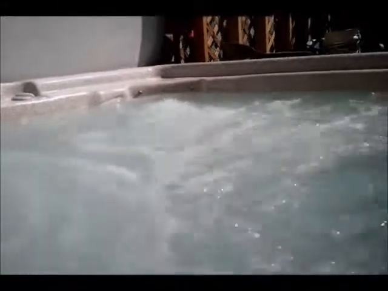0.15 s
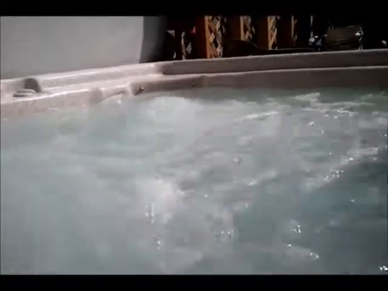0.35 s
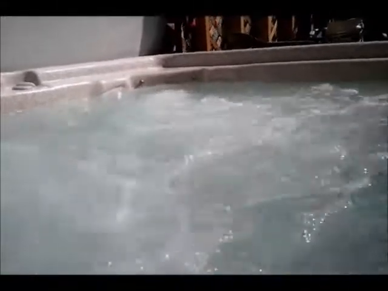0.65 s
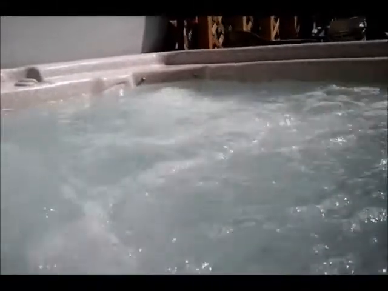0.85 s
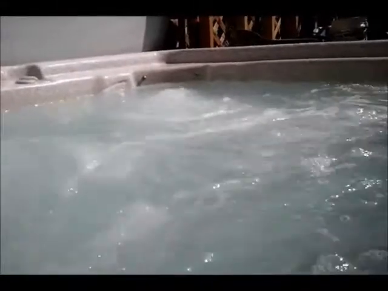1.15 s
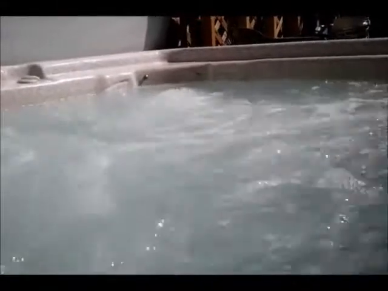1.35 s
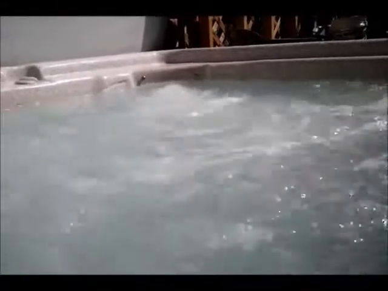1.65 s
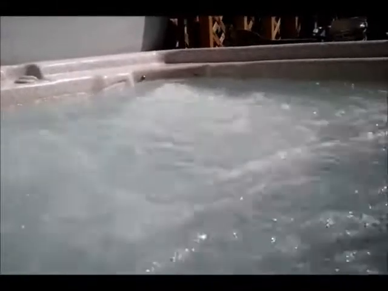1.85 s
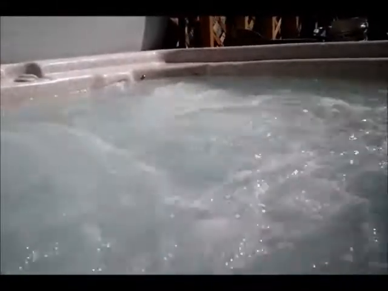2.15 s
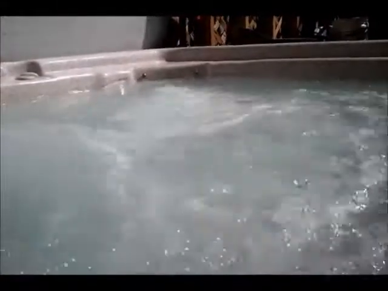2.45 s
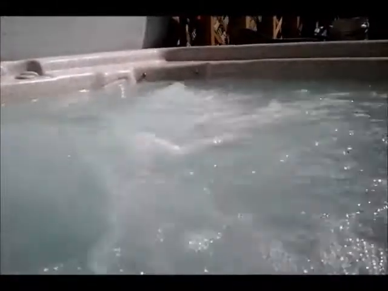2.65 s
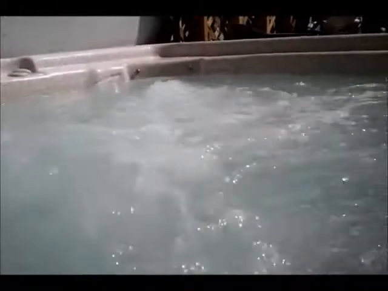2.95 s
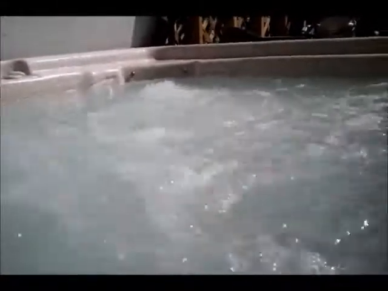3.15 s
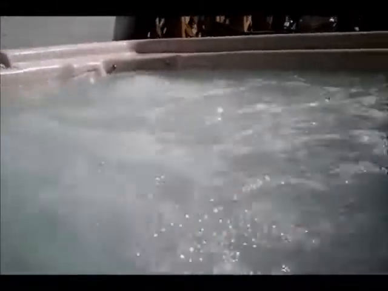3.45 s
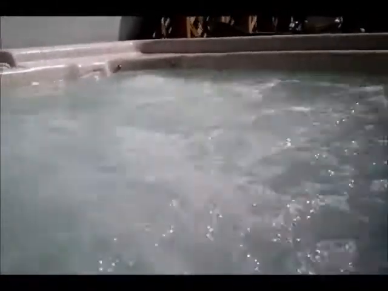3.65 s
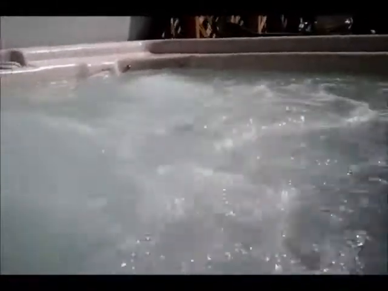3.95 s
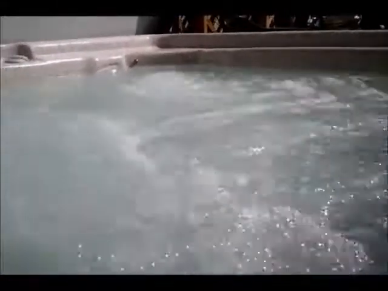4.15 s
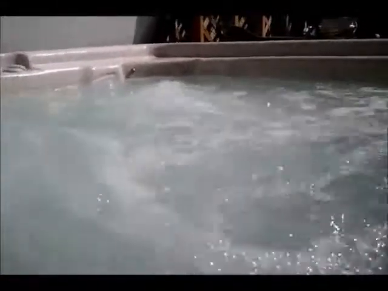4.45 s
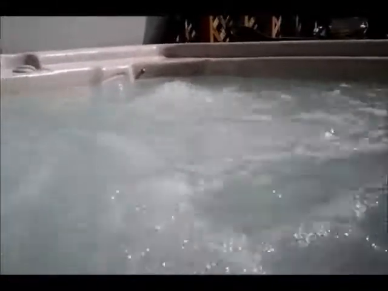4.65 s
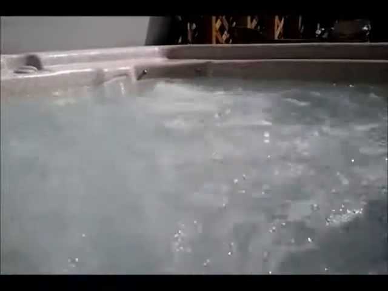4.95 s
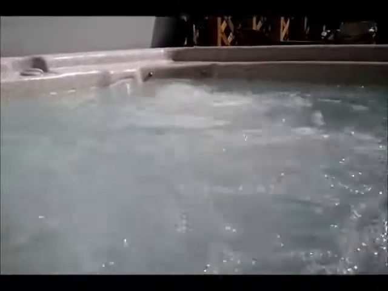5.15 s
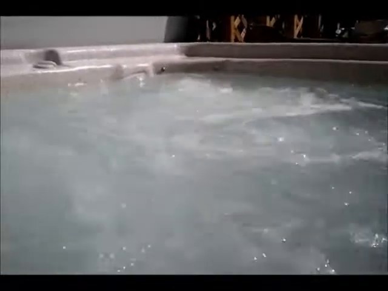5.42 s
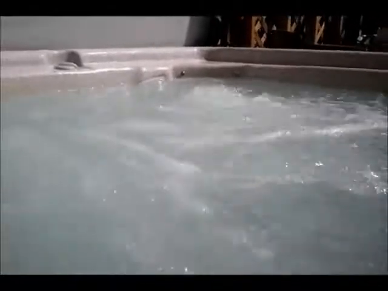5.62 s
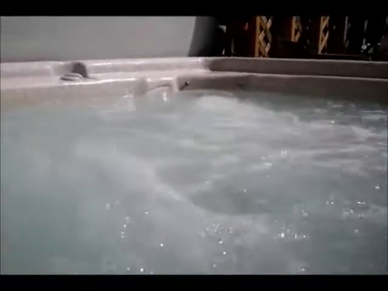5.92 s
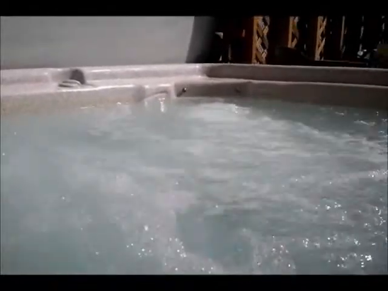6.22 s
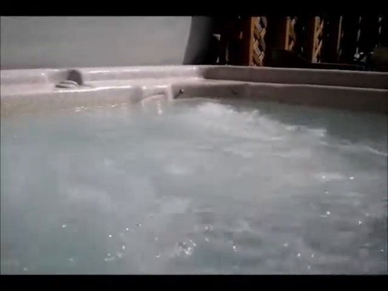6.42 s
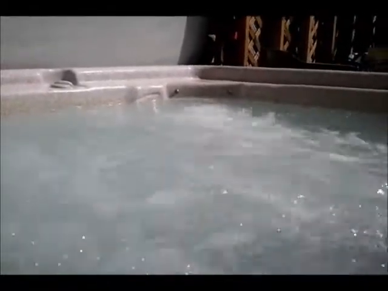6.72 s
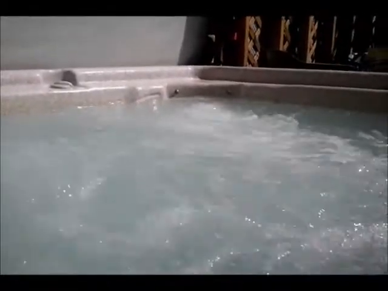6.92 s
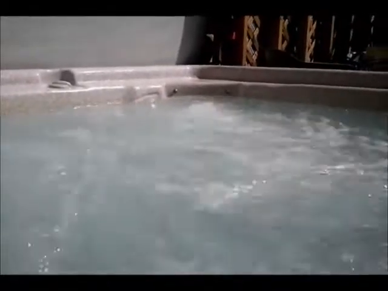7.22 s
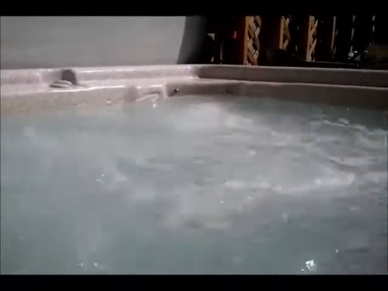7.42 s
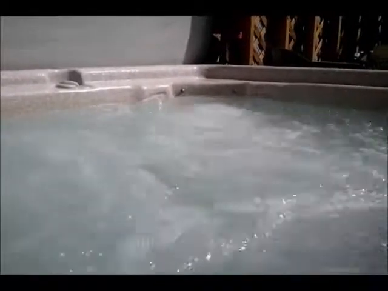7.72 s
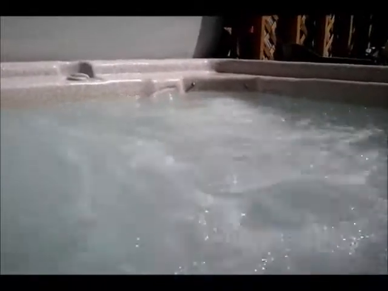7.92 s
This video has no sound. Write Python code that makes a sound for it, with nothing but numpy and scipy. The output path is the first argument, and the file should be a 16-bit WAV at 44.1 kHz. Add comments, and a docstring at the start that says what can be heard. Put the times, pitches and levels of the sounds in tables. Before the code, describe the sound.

A deep constant pump hum under bubbling, rumbling tub water, soft froth hissing on top, with sharp nearby drips and one hard splash.

```python
"""At the rim of an outdoor hot tub, the pump hums, jets churn up clouds of bubbles and foam fizzes.
Sines make the pump; damped, rising sines over coloured noise make the bubbles; narrow noise simmers.
Close by, crests splash as bursts of noise and drops plop as ringing bubbles; the tub's shell answers.
A small camera ducks its gain on the loudest splashes and clips their peaks."""
import sys
import numpy as np
from scipy import signal
from scipy.fft import rfft, irfft, next_fast_len
from scipy.io import wavfile
from scipy.ndimage import uniform_filter1d, map_coordinates

SR = 44100
rng = np.random.default_rng(int(sys.argv[2]) if len(sys.argv) > 2 else 0)


def generate_wav(sig):
    """Save sig (samples, or channels by samples) to the path in sys.argv[1] as 16-bit PCM at SR."""
    pcm = np.round(np.clip(np.atleast_2d(sig).T, -1, 1) * 32767).astype(np.int16)
    wavfile.write(sys.argv[1], SR, pcm)


N = 356311
T = np.arange(N) / SR  # time in seconds


def amp(db):
    """Logarithmic level: decibels become an amplitude gain."""
    return 10 ** (np.asarray(db) / 20)


def unit(x):
    """Normalisation: x is scaled to rms 1."""
    return x / np.sqrt(np.mean(x ** 2) + 1e-20)


def noise(length=N):
    """White noise: independent normal samples hold equal mean power at every frequency."""
    return rng.standard_normal(length)


def wobble(rate):
    """Slow random modulation: a smooth curve through random knots, rate of them a second."""
    return map_coordinates(noise(400), [T * rate + 2], mode="mirror")


def filtered(x, gain):
    """Linear filtering: the spectrum of x is multiplied by a gain that depends on frequency."""
    m = next_fast_len(len(x) + 8192)
    hz = np.fft.rfftfreq(m, 1 / SR) + 0.0012  # just above zero, so that its logarithm exists
    return irfft(rfft(x, m) * gain(hz), m)[:len(x)]


def coloured(x, spectrum):
    """Spectral shaping: x takes on a curve of (Hz, relative dB) points, at rms 1."""
    point_hz, point_db = np.transpose(spectrum)

    def gain(hz):
        return amp(np.interp(np.log(hz), np.log(point_hz), point_db, left=-120, right=-120))

    return unit(filtered(x, gain))


def add(track, s, sound):
    """Superposition: a sound is summed into the track from time s."""
    part = track[round(s * SR):][:len(sound)]
    part += sound[:len(part)]


# Steady tones of the pump's turning parts. Each row: frequency in Hz, level in dB rms.
SHAFT_TONES = [(48.7, -33), (57.6, -30.5)]


def pump():
    """Magnetic hum: the motor sounds at twice the mains rate; its turning parts add faint low tones."""
    mains_hz, hum_db, waver_db = 60.003, -13.5, 0.74
    hum = amp(hum_db + waver_db * wobble(6.5)) * np.sin(2 * np.pi * 2 * mains_hz * T)
    shafts = sum(amp(db) * np.sin(2 * np.pi * hz * T + 0.22 * wobble(1.4)) for hz, db in SHAFT_TONES)
    return np.sqrt(2) * (hum + shafts)  # a sine of rms 1 peaks at the root of 2


def bubbles(count, lo_hz, hi_hz, cycles, spread_db, rise):
    """Bubble resonance: a cloud of damped, rising sines of random size, even in power per Hz, at rms 1."""
    when, size, strength = rng.random((count, 3)).T[:, :, None]
    hz = lo_hz * (hi_hz / lo_hz) ** size
    k = np.arange(min(int(cycles * SR / lo_hz), 5000000 // count))  # capped to save memory
    age = k / SR * hz / cycles  # 1 after the given number of cycles at the starting pitch
    gain = hz * amp(-spread_db * np.log(1 - .99 * strength))
    phase = 2 * np.pi * cycles * age * (1 + rise * age / 2)
    ring = gain * np.exp(-4 * age) * np.sin(phase)
    sample = (when * N).astype(int) + k
    return unit(np.bincount(sample.ravel(), ring.ravel(), N)[:N])


def wash(grains, spectrum, near_db):
    """Statistical blur: near bubbles stand in the noise of countless faint ones, at rms 1."""
    blur = coloured(noise(), spectrum)
    return unit(blur + amp(near_db) * coloured(grains, spectrum))


# Strength of the flow at the surface, interpolated in time.
# Each row: time in seconds, burble level in dB before trim, foam level in dB before trim.
SURFACE_FLOW = [(0.0, -22, -23), (0.43, -24.5, -23), (0.83, -21, -22), (1.26, -22.5, -22.5),
                (4.19, -25, -24), (5.31, -23.5, -23), (5.71, -25, -23), (7.63, -24.5, -24),
                (8.08, -23, -21.5)]
# Colours of big air pockets, their gurgle, small surface bubbles and the finest froth.
# Each row of the four: frequency in Hz, relative level in dB per Hz.
RUMBLE_COLOUR = [(12, -11), (25, -6.5), (45, -8.5), (60, -7.5), (75, 1), (97, 2), (140, 2), (175, -5.5),
                 (260, -22.5), (600, -56)]
CHURN_COLOUR = [(100, -24), (175, -5), (220, 1.5), (290, -1.5), (380, -5), (450, -3), (620, -6.5),
                (780, -11), (1100, -14.5), (1600, -36), (3500, -39)]
BURBLE_COLOUR = [(600, -14), (1200, -7), (1550, -4), (1950, -4.5), (2300, -8), (2800, -13), (3600, -17),
                 (6000, -30.5)]
FOAM_COLOUR = [(1500, -8.5), (2700, -10), (3400, -12.5), (4200, -5.5), (5200, -2.5), (6300, -3.5),
               (7000, -9), (7600, -16)]


def jets():
    """Size sets pitch: big air pockets rumble and gurgle; small bubbles burble and fizz at the surface."""
    rumble_db, churn_db = -20.0, -18.0
    burble_trim_db, foam_trim_db = -0.36, 0.74
    s, burble_flow_db, foam_flow_db = np.transpose(SURFACE_FLOW)
    burble_db = np.interp(T, s, burble_flow_db) + burble_trim_db
    foam_db = np.interp(T, s, foam_flow_db) + foam_trim_db
    surge = wobble(9)  # crests stir the surface and the foam together

    rumble = coloured(noise(), RUMBLE_COLOUR)
    gurgles = bubbles(count=3000, lo_hz=161.7, hi_hz=1448, cycles=16.7, spread_db=2.5, rise=0.14)
    churn = wash(gurgles, CHURN_COLOUR, near_db=-6)
    small = bubbles(count=6000, lo_hz=885, hi_hz=3656, cycles=18, spread_db=3.3, rise=0.15)
    burble = wash(small, BURBLE_COLOUR, near_db=-1.5)
    fizz = bubbles(count=24000, lo_hz=2520, hi_hz=7950, cycles=7.5, spread_db=3, rise=0.22)
    foam = wash(fizz, FOAM_COLOUR, near_db=-5)

    deep = rumble * amp(rumble_db + 1.0 * wobble(4.6)) + churn * amp(churn_db + .2 * wobble(12))
    surface = burble * amp(burble_db + 0.61 * surge + 1.0 * wobble(25))
    froth = foam * amp(foam_db + 0.21 * surge + .6 * wobble(30))
    return deep + surface + froth


# Narrow band of like-sized bubbles. Each row: frequency in Hz, relative level in dB per Hz.
SIMMER_COLOUR = [(1700, -25.5), (1950, -3), (2050, 2), (2150, -4.5), (2400, -29)]
# Patches that swell and fade.
# Each row: time of the peak in seconds, level in dB, time constant of swell and fade in seconds.
SIMMER_PATCHES = [(4.399, -30.5, .13), (5.167, -26, 0.16), (6.72, -27, .05)]


def simmer():
    """Shared resonance: bubbles of one size sing in a narrow band; patches swell and fade evenly."""
    swell = amp(-36.5)  # the faint rest between patches
    for s, db, fade_s in SIMMER_PATCHES:
        swell = swell + amp(db) * np.exp(-np.abs(T - s) / fade_s)
    return swell * coloured(noise(), SIMMER_COLOUR)


def shell(x, wet_db, t60):
    """Reverberation: the tub's walls and the water surface throw back a short flurry of echoes."""
    t = np.arange(SR // 4) / SR
    echoes = noise(len(t)) * amp(-60 * t / t60) * (t > .003)  # the first arrive after 3 ms
    tail = unit(echoes) / np.sqrt(len(t))  # unit energy
    return np.pad(x, (0, len(t) - 1)) + amp(wet_db) * signal.fftconvolve(x, tail)


def spray(t, centre_hz, octaves):
    """Band-limited noise: fine droplets hiss in a bell-shaped band around one pitch, at rms 1."""
    return unit(filtered(noise(len(t)), lambda hz: np.exp(-(np.log2(hz / centre_hz) / octaves) ** 2 / 2)))


def burst(length, centre_hz, octaves):
    """Transient excitation: a short burst of spray, with the tub's answer."""
    t = np.arange(SR // 3) / SR
    rise = 1 - np.exp(-t / (0.072 * length))  # long sloshes also start more softly
    fade = np.exp(-(t / length) ** 2)
    return shell(spray(t, centre_hz, octaves) * rise * fade, wet_db=-6.0, t60=.08)


# Water that sloshes or breaks into spray. Each row: start in seconds, relative level in dB,
# fade length to 1/e in seconds, centre pitch in Hz, bandwidth as a standard deviation in octaves.
CRESTS = [(.626, -14.5, 0.027, 5500, .4), (.648, -12, .042, 5000, 1), (1.62, -18.5, .16, 224, .13),
          (3.228, -6, 0.005, 5900, 0.42), (3.243, 8.5, 0.017, 3280, 1.2), (3.239, -1, 0.031, 1750, .7),
          (6.701, -20, .07, 2020, 0.42), (6.892, -21.5, .08, 1750, .45)]
# Flung droplets that smack the surface. Each row: start in seconds, relative level in dB.
DROPLET_SMACKS = [(0.623, -6.5), (.919, 4), (1.044, -11), (1.413, -4.5), (1.437, -5)]


def splashes():
    """Impact noise: crests break and slosh, each in its own way; the flung droplets smack alike."""
    out = np.zeros(N)
    for s, db, length, centre_hz, octaves in CRESTS:
        add(out, s, amp(db) * burst(length, centre_hz, octaves))
    for s, db in DROPLET_SMACKS:
        add(out, s, amp(db) * burst(length=0.005, centre_hz=4430, octaves=0.27))
    return out


def stray_drops(count):
    """Random arrivals: rows of start in s, relative level in dB and pitch in Hz, drawn by chance."""
    rows = []
    for _ in range(count):
        s = rng.uniform(0, T[-1])
        db = -12 + 2 * rng.normal()
        hz = 1796 * 2 ** (.22 * rng.normal())  # scattered in octaves
        rows.append((s, db, hz))
    return rows


# Near drops that trap a ringing bubble.
# Each row: start in seconds, relative level in dB, starting pitch in Hz.
NEAR_DROPS = [(.684, 1.5, 1910), (.707, 9.5, 1930), (.883, -7.5, 1185), (.920, 17.5, 1939),
              (1.420, -3, 1990), (1.439, -0.5, 1650), (1.809, -7.5, 1720), (1.822, -7.5, 2090),
              (1.882, -1.5, 1985), (5.562, -2, 1438), (6.70, -8.5, 2050), (6.889, -8.5, 1430)]


def plops():
    """Trapped-air resonance: a drop ticks and spatters; its bubble rings among smaller ones and sags."""
    sag, sag_s = 0.07, 0.022  # fraction of the pitch lost, time constant in seconds
    slosh_db, spatter_db, spatter_hz = -5, -15, 4450
    tick_db, tick_s = -14, 0.0058  # starting level, time to fall by 60 dB
    out, t = np.zeros(N), np.arange(SR // 8) / SR
    for s, db, hz in list(NEAR_DROPS) + stray_drops(count=18):
        t60 = 0.031 * 2 ** (db / 19)  # seconds; a drop 19 dB stronger rings twice as long
        pitch = hz * (1 - sag * (1 - np.exp(-t / sag_s)))
        tone = 1.04 * np.sin(2 * np.pi * np.cumsum(pitch) / SR)
        slosh = amp(slosh_db) * spray(t, hz, octaves=0.13)
        spatter = amp(spatter_db) * spray(t, spatter_hz, octaves=0.2)
        life = amp(-60 * t / t60) * (1 - np.exp(-t / 0.0006))
        tick = amp(tick_db - 60 * t / tick_s) * noise(len(t))
        drop = (tone + slosh + spatter) * life + tick
        add(out, s, amp(db) * shell(drop, wet_db=-3, t60=0.115))
    return out


def scene():
    """Superposition: pump, jets, simmer and splashing water sum into one channel."""
    return (pump() + jets() + simmer() + splashes() + plops())[None]


def gain_control(x):
    """Compression: gain drops within milliseconds when sound above the bass passes a limit, then recovers."""
    limit_db, slope, release_s, lag_s = -12, 0.59, 0.041, 0.0043  # slope: dB of cut per dB of excess
    sensed = filtered(x, lambda hz: hz / np.hypot(hz, 500))
    level_db = 10 * np.log10(np.abs(uniform_filter1d(sensed ** 2, size=260)) + 1e-9)
    excess_db = np.maximum(level_db - limit_db, 0)
    recovery = np.exp(T / release_s)
    held_db = np.maximum.accumulate(excess_db * recovery) / recovery  # peaks decay exponentially
    lag = np.exp(-1 / (lag_s * SR))
    cut_db = slope * signal.lfilter([1 - lag], [1, -lag], held_db)
    return x * amp(-cut_db)


def record(dry):
    """Saturation: the narrow-band camera rides its gain, squashes peaks lopsidedly and clips overshoots."""
    offset, knee = -.298, 15  # the offset makes the limits lopsided; a higher knee is sharper
    band_hz, top_hz = 7330, 16000
    driven = gain_control(dry[0]) + offset
    squashed = driven / (1 + np.abs(driven) ** knee) ** (1 / knee) - offset
    narrow = filtered(squashed, lambda hz: 1 / np.sqrt(1 + (hz / band_hz) ** 160))
    clipped = np.clip(narrow, -1 - offset, 1 - offset)
    return offset + filtered(clipped, lambda hz: hz < top_hz)[None]  # the constant offset remains


dry = scene()
out = record(dry)
generate_wav(out)
```